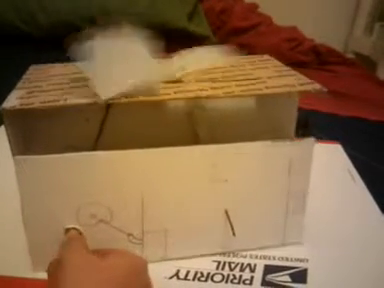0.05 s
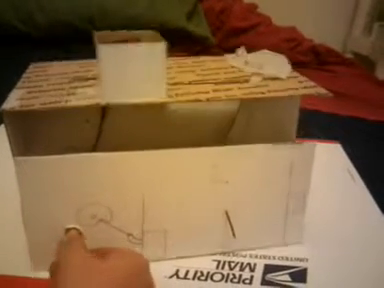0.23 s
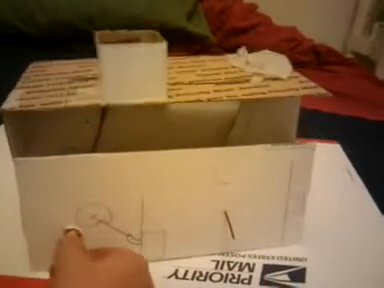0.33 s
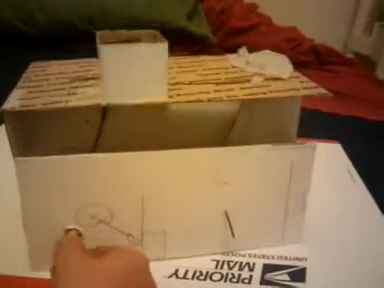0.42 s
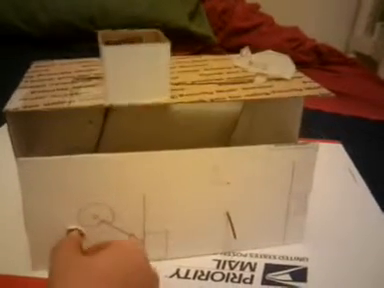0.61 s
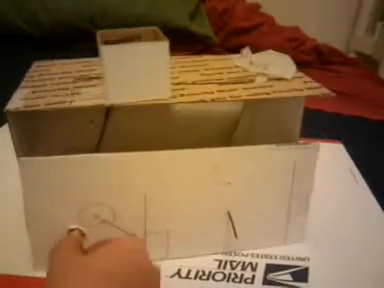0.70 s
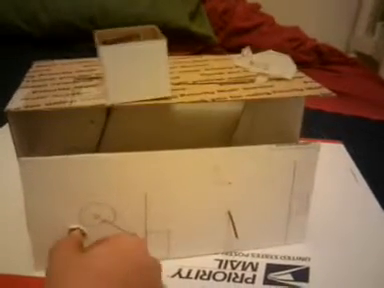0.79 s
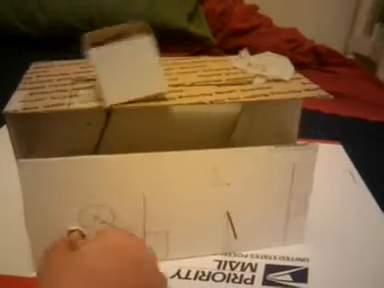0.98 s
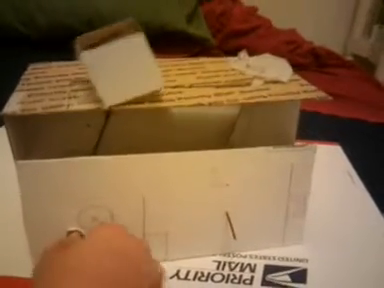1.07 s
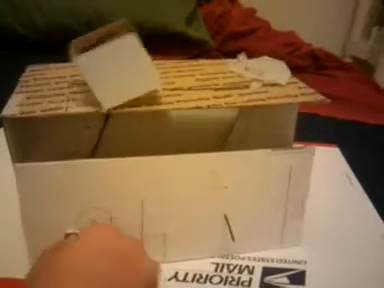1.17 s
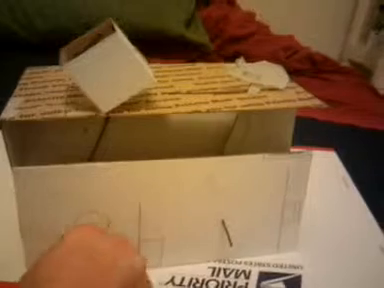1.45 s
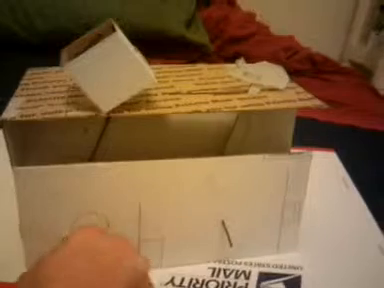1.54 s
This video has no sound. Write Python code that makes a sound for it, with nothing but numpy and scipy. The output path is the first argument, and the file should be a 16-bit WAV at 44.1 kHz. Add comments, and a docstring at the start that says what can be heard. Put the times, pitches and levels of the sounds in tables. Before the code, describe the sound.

Sharp hollow cardboard knocks from a hand-cranked box. Two faint taps near 0.1 s; at 0.22 s a card cube clatters onto the lid, rebounding until 0.29 s with a soft thump; at 0.40 s a brighter, crisp linkage knock bounces quickly. Duller taps follow at 0.68, 0.76, 0.92, 1.06, 1.2 and 1.32 s, with faint scrapes and papery rubbing. Close, small room, short reverberation, quiet hiss and rumble, dulled treble.

```python
"""Cardboard automaton in a small room

A hand turns the crank: a hollow card cube drops onto the lid and rebounds, then the linkage knocks.
Dull cam taps come before and after. These impacts excite damped modes, crunch and room reflections.
The cam scrapes by stick-slip and the shaft rubs in its card bearings, as random pulses shaped in
spectrum; shaped noise gives the quiet steady hiss and rumble of the room."""
import sys
import numpy as np
from scipy import signal
from scipy.fft import rfft, irfft
from scipy.io import wavfile

SR = 44100
rng = np.random.default_rng(int(sys.argv[2]) if len(sys.argv) > 2 else 0)


def inscribe(sig):
    """Save sig as 16-bit PCM at rate SR to the path in sys.argv[1].

    A 1-D sig is mono; a 2-D sig holds one channel per row.
    Samples are clipped to [-1, 1] before scaling.
    """
    pcm = np.round(np.clip(np.atleast_2d(sig).T, -1, 1) * 32767)
    wavfile.write(sys.argv[1], SR, pcm.astype(np.int16))


N = 70560
TIME = np.arange(N) / SR
HZ = np.arange(N // 2 + 1) * SR / N


def cube():
    """Impact excitation: the hollow cube clatters onto the lid, which sags and swings back as one damped mode."""
    # the cube lands, edge by edge: t/s, level/dB, contact brightness f/Hz
    landings = [(.2166, -21, 9200), (.2184, -21, 7000), (.2220, -17.5, 4500), (.2295, -35, 3350),
                (.2425, -28, 3010), (.2822, -27, 2100), (.2860, -29, 2300), (.2915, -23.5, 1380)]
    # modes of the hollow cube: f/Hz, level/dB
    cube_modes = [(175, -15), (260, -13), (420, -8.5), (705, -7.5), (855, -4.5), (1100, -2), (1600, -15),
                  (1860, -6), (2110, 2), (3200, -11.5), (4100, -5.5), (6050, -9.5)]
    # colour the cube sends into the room from all its faces: f/Hz, level/dB
    cube_spread = [(80, 0), (160, 14), (330, 18.5), (550, 16), (850, 28.5), (1200, 21), (1400, 28),
                   (1650, 34.5), (2200, 26.5), (2900, 18.5), (4200, 14), (5200, 23.5), (6100, 1),
                   (7200, 12)]
    # the lid's soft thump: t/s, level/dB, f/Hz, t60/s
    lid_thump = (.2345, -37.5, 92, .055)
    start_s, db, hz, t60 = lid_thump
    click = np.arange(N) == int(start_s * SR)
    thump = from_db(db) * ring(click, hz, t60)
    clatter = struck(landings, cube_modes, cube_spread, smear_s=0.0009, ring_t60_s=0.018, crunch_db=8.5)
    return clatter + thump


def linkage():
    """Repeated impact: the loose linkage drops against its frame and bounces at once, ringing both."""
    # contacts of the linkage: t/s, level/dB, contact brightness f/Hz
    knocks = [(.3969, -16, 7000), (.3990, -23.5, 2600), (.4120, -28.5, 3500), (.4216, -31.5, 1700),
              (.4358, -41, 3500)]
    # modes of the linkage and its frame: f/Hz, level/dB
    linkage_modes = [(170, -18.5), (285, -12.5), (450, -10.5), (580, -18), (925, -9), (1170, -14),
                     (1785, -6.5), (2300, -4.5), (2700, -21), (3445, -26), (4100, -13), (5100, -21.5)]
    # colour the linkage sends into the room from all its faces: f/Hz, level/dB
    linkage_spread = [(80, -21.5), (160, 20.5), (450, 7), (680, 7), (930, 27), (1350, 11.5), (1800, 27),
                      (2300, 19), (2750, 24.5), (3200, 12), (5000, 12), (7000, -4)]
    return struck(knocks, linkage_modes, linkage_spread, smear_s=0.00016, ring_t60_s=0.022, crunch_db=11)


def cam():
    """Plate excitation: bumps of the cam ring the modes of the box panels."""
    # taps of the cam against the box: t/s, level/dB, contact brightness f/Hz
    taps = [(.086, -42, 3970), (.113, -37, 2020), (.6798, -31, 2600), (.6936, -36, 2600),
            (.7612, -26, 2400), (.773, -47, 1600), (.921, -33, 252), (1.061, -41, 300), (1.095, -52, 3500),
            (1.1998, -37, 2000), (1.32, -43.5, 4000)]
    # modes of the box panels: f/Hz, level/dB
    panel_modes = [(150, -16), (255, -12.5), (510, -7.5), (700, -12), (890, -1), (1040, -1), (1660, -20),
                   (2220, -13.5)]
    # colour the panels send into the room from all their faces: f/Hz, level/dB
    panel_spread = [(100, 10), (250, 23.8), (500, 25.3), (680, 23), (950, 25.8), (1400, 23.7), (2200, 23.7),
                    (4000, 9.6), (7000, 2)]
    return struck(taps, panel_modes, panel_spread, smear_s=0.00055, ring_t60_s=0.025, crunch_db=3.5)


def struck(hits, modes, spread, smear_s, ring_t60_s, crunch_db):
    """Modal superposition: contacts crunch and ring damped modes, unevenly excited; the room answers."""
    scatter_db = 1.0
    ring_slope = 0.49  # ring_t60_s holds at 1 kHz; higher modes die sooner by this power
    radiation_hz = 141  # small panels radiate little below this
    pushes = np.array([push(start_s, db, hz, smear_s) for start_s, db, hz in hits])
    all_pushes = pushes.sum(axis=0)
    strengths = from_db(scatter_db * rng.standard_normal((len(hits), len(modes))))
    direct = from_db(crunch_db) * crunch(all_pushes)
    for k, (hz, db) in enumerate(modes):
        t60 = ring_t60_s * (1000 / hz) ** ring_slope
        sign = (-1) ** k  # successive modes alternate in polarity
        direct = direct + sign * from_db(db) * ring(strengths[:, k] @ pushes, hz, t60)
    direct = signal.sosfilt(signal.butter(2, radiation_hz, "high", fs=SR, output="sos"), direct)
    reflected = signal.fftconvolve(all_pushes, room_echo(spread))[:N]
    return direct + reflected


def push(start_s, db, brightness_hz, smear_s):
    """Dispersion: bending waves in the card bring each frequency of a contact a little late."""
    bend_step_hz = 900
    steps = np.arange(0, SR / 2, bend_step_hz)
    lateness = smear_s * np.interp(HZ, steps, rng.random(len(steps)))
    delay = int(start_s * SR) / SR + lateness
    # phase is the group delay summed over frequency
    phase = 2 * np.pi * (np.cumsum(delay) - delay[0]) * SR / N
    softness = (1 + 1j * HZ / brightness_hz) ** 2  # a softer contact is duller
    return from_db(db) * irfft(np.exp(-1j * phase) / softness, N)


def ring(x, hz, t60):
    """Damped resonance: a unit click sets a decaying sine of starting height 1 ringing."""
    r, w = from_db(-60 / (t60 * SR)), 2 * np.pi * hz / SR
    return signal.lfilter([0, np.sin(w)], [1, -2 * r * np.cos(w), r * r], x + 1e-18)


def crunch(pushes):
    """Random micro-fracture: each contact crushes card fibres in a fast-dying shower of tiny bright snaps."""
    snaps_per_s, t60_s = 2500, 0.028
    # pass band of the crunch: lowest f/Hz, highest f/Hz
    crunch_band = (1700, 5200)
    happens = rng.random(N) < snaps_per_s / SR
    snaps = rng.standard_normal(N) * happens * from_db(-60 * TIME / t60_s)
    unit_energy_snaps = rms_one(snaps) / np.sqrt(N)
    shower = signal.fftconvolve(pushes, unit_energy_snaps)[:N]
    return signal.sosfilt(signal.butter(2, crunch_band, "band", fs=SR, output="sos"), shower)


def scraping():
    """Stick-slip friction: in each short stroke the cam slips along its follower at uneven intervals."""
    slips_per_s, slip_spread_db = 400, 3
    # strokes of the cam: start t/s, length t/s, level/dB
    scrapes = [(0.087, .04, -52), (1.095, 0.03, -52.5), (1.182, .03, -63), (1.283, 0.029, -52),
               (1.319, 0.027, -54), (1.35, .035, -60)]
    # colour of the scraped cam: f/Hz, relative level per Hz/dB
    scrape_colour = [(100, -5), (480, 2), (680, -1.5), (900, -1.5), (1500, -8.5), (1950, -0.5),
                     (2400, -3.5), (3100, -33), (4500, -10), (7000, -26)]
    out = np.zeros(N)
    for start, length, db in scrapes:
        count = int(length * slips_per_s) + 1
        times = start + length * (np.arange(count) + rng.random(count)) / count
        sizes = from_db(slip_spread_db * rng.standard_normal(count))
        slips = np.zeros(N)
        slips[(times * SR).astype(int)] = sizes * rng.choice([-1, 1], count)
        # the root sets the level over the stroke rather than over the whole sound
        out += from_db(db) * np.sqrt(length * SR / N) * coloured(slips, scrape_colour)
    return out


def rubbing():
    """Dry friction: card fibres of shaft and cam catch and slip in a dense random stream of tiny ticks."""
    grains_per_s, grain_spread_db = 2200, 1.5
    # level of the rubbing: t/s, level/dB
    rub_level = [(0, -49), (.06, -55), (.093, -46), (.165, -54.5), (.21, -43.5), (.26, -40), (.48, -55),
                 (.58, -60), (.66, -53.5), (.85, -62.5), (.95, -54), (1.04, -57.5), (1.115, -51.5),
                 (1.155, -56.5), (1.19, -50), (1.235, -56.5), (1.325, -49.5), (1.41, -55.5), (1.6, -72)]
    # colour of rubbed card: f/Hz, relative level per Hz/dB
    rub_colour = [(60, -11.5), (150, -7.5), (450, -4), (680, -6), (1050, -3), (1450, -6), (2050, -9.5),
                  (3000, -15), (4800, -30.5), (7000, -44)]
    sizes = from_db(grain_spread_db * np.minimum(rng.exponential(1, N), 4))
    signs = rng.choice([-1, 1], N)
    slips = sizes * signs * (rng.random(N) < grains_per_s / SR)
    level = from_db(np.interp(TIME, *np.transpose(rub_level)))
    return level * coloured(slips, rub_colour)


def room_echo(colour):
    """Reverberation: dense reflections of a given colour build up quickly and die away band by band."""
    gap_s, build_s = 0.003, 0.001
    # decay of the room: f/Hz, t60/s
    room_t60 = [(150, 0.83), (500, 0.13), (1000, 0.25), (2000, 0.28), (4000, 0.35), (7000, 0.39)]
    white = rfft(rng.standard_normal(N)) * lingering()
    edges = np.geomspace(70, 9000, 26)
    late = np.maximum(TIME - gap_s, 0)
    build_up = 1 - np.exp(-late / build_s)
    out = 0
    for low, high in zip(edges, edges[1:]):
        hz = np.sqrt(low * high)
        fade = from_db(-60 * late / at_hz(room_t60, hz))
        band = irfft(white * ((HZ >= low) & (HZ < high)), N) * fade * build_up
        # energy in proportion to bandwidth, as in a click
        out = out + from_db(at_hz(colour, hz)) * rms_one(band) * np.sqrt(2 * (high - low) / SR / N)
    return out


def lingering():
    """Resonance: gain by frequency of the narrow peaks that linger in the box and the room."""
    width_hz = 26
    # narrow resonances: f/Hz, lift/dB
    resonances = [(885, 2.5), (1640, 6), (1875, 2.5), (1937, 5), (2086, -0.5), (2280, 5.5)]
    gain = 1
    for hz, db in resonances:
        gain = gain + (from_db(db) - 1) / (1 + (2 * (HZ - hz) / width_hz) ** 2)
    return gain


def room_hiss():
    """Stationary random noise: the steady hiss and rumble of the room."""
    level_db = -53.5
    # colour of the hiss and rumble: f/Hz, relative level per Hz/dB
    hiss_colour = [(25, 8), (50, -7), (100, 5), (150, 5.5), (320, -0.5), (700, -2.5), (950, 0.5),
                   (1400, -1), (2100, 0.5), (3100, -6.5), (4500, -10), (7000, -20)]
    return from_db(level_db) * coloured(rng.standard_normal(N), hiss_colour)


def coloured(x, spectrum):
    """Linear filtering: give a sound a spectrum with the narrow resonances, at rms 1."""
    gain = from_db(at_hz(spectrum, HZ)) * lingering()
    return rms_one(irfft(rfft(x) * gain, N))


def at_hz(points, hz):
    """Logarithmic frequency scale: interpolate a table along it."""
    f, value = np.transpose(points)
    return np.interp(np.log(hz + 1e-9), np.log(f), value)


def rms_one(x):
    """Mean-square level: scale to rms 1."""
    return x / np.sqrt(np.mean(x ** 2) + 1e-20)


def from_db(db):
    """Logarithmic level: decibels to amplitude gain."""
    return 10 ** (np.asarray(db) / 20)


def scene():
    """Superposition: the mechanism sounds over the room's hiss."""
    return (cube() + linkage() + cam() + scraping() + rubbing() + room_hiss())[None]


def record(dry):
    """Band limitation: a steep elliptic low-pass removes the top."""
    cutoff_hz = 7350
    return signal.sosfilt(signal.ellip(10, .3, 75, cutoff_hz, fs=SR, output="sos"), dry)


dry = scene()
out = record(dry)
inscribe(out)
```